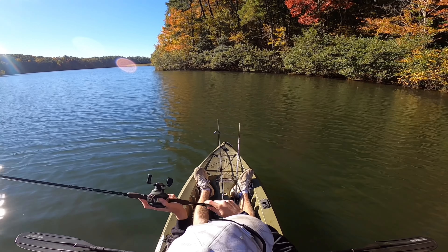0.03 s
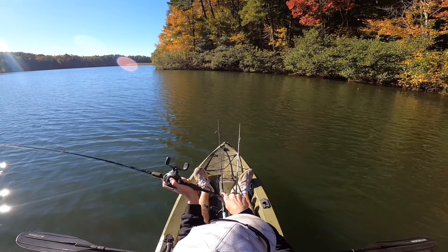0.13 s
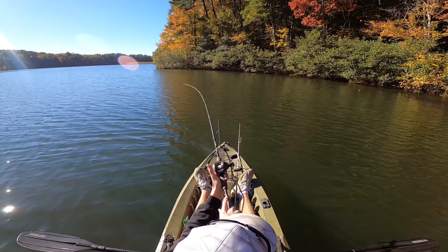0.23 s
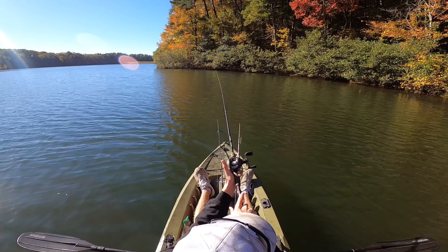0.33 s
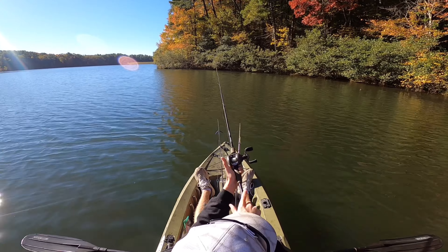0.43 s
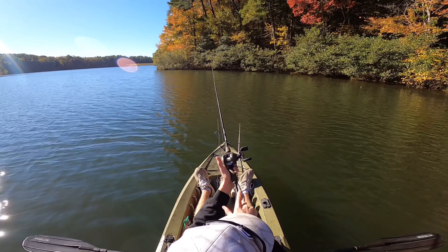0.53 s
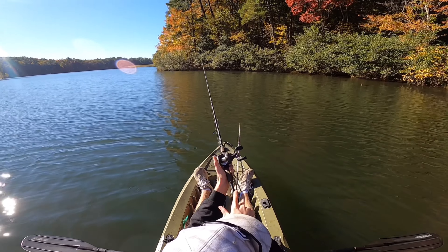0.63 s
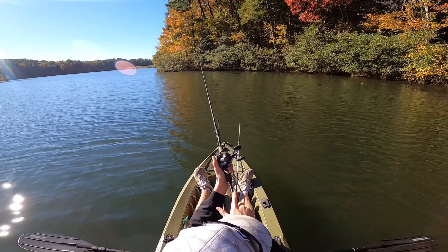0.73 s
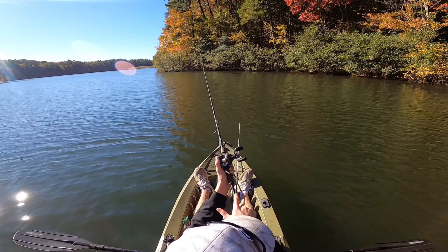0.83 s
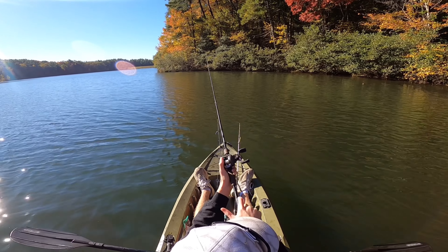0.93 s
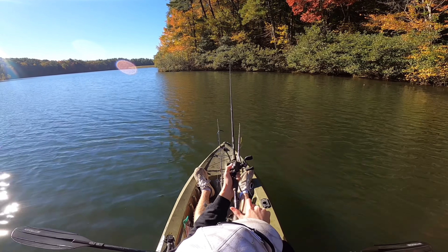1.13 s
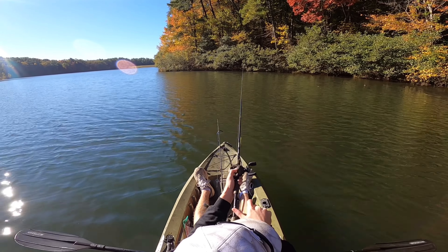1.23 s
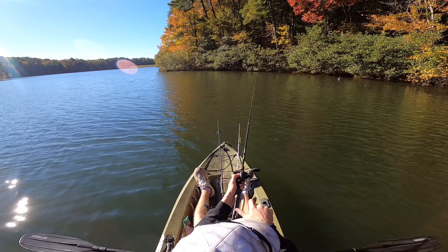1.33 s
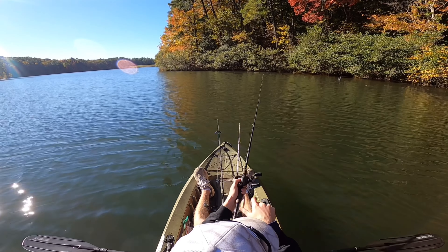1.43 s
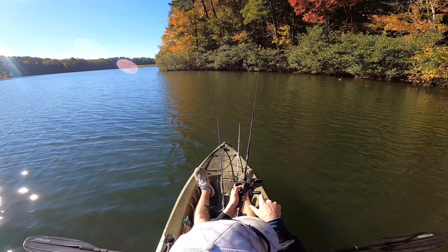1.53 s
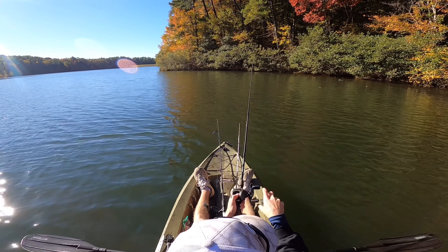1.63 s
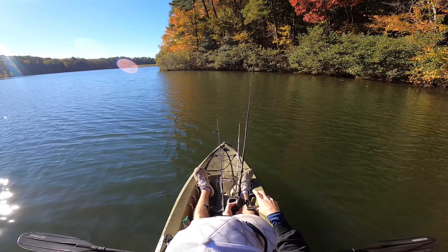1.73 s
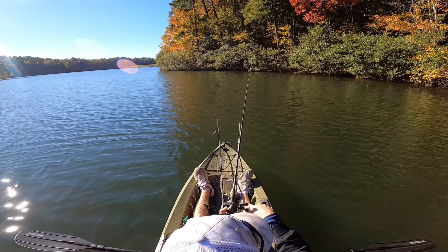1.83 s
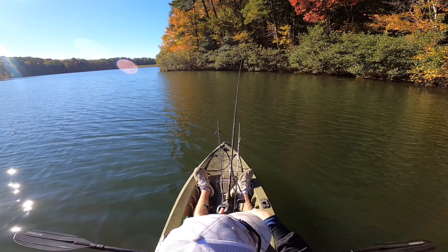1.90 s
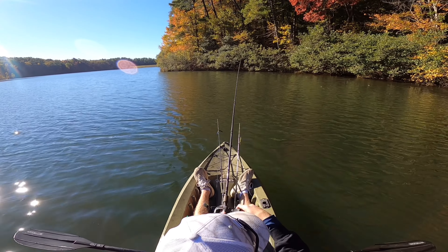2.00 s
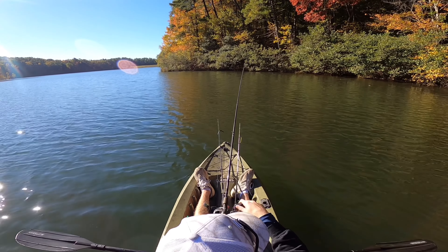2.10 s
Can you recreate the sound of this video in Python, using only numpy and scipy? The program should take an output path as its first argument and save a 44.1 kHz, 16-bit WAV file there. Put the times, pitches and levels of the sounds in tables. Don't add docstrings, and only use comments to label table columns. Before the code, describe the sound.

Fishing rod cast: quick swish, sharp thumb-release click, raspy whirring spool winding down, loud metallic clack

```python
import sys
import numpy as np
from scipy import signal
from scipy.fft import rfft, irfft, next_fast_len
from scipy.io import wavfile

SR = 44100
rng = np.random.default_rng(int(sys.argv[2]) if len(sys.argv) > 2 else 0)


def nominal_scale(level):
    x = np.asarray(level, float) / 20
    return 10 ** x


def master(y):
    cut = np.clip(np.atleast_2d(y).T, -1, 1)
    pcm = np.round(cut * 32767)
    wavfile.write(sys.argv[1], SR, pcm.astype(np.int16))


N = 92610
T = np.arange(N) / SR


def rms_one(x):
    return x / np.sqrt(np.mean(x ** 2) + 1e-20)


def curve(rows, x):
    return np.interp(x, *np.transpose(rows))


def log_curve(rows, hz):
    return curve([(np.log(f), db) for f, db in rows], np.log(hz))


def filtered(x, order, hz, kind="low"):
    return signal.sosfilt(signal.butter(order, hz, kind, fs=SR, output="sos"), x)


def resonance(x, hz, width_hz):
    r = np.exp(-np.pi * width_hz / SR)
    poles = [1, -2 * r * np.cos(2 * np.pi * hz / SR), r * r]
    return signal.lfilter(np.array([1, 0, -1]) * (1 - r * r) / 2, poles, x)


def drift(rate_hz):
    r = np.exp(-80 * np.pi * rate_hz / SR)
    white = rng.standard_normal(N // 40 + 2002)
    slow = signal.lfilter([1], [1, -2 * r, r * r], white)[2000:]
    return np.interp(np.arange(N) / 40, np.arange(len(slow)), rms_one(slow))


def pair(apart, grains=1):
    mid, side = rng.standard_normal((2, N)) * grains
    treble = filtered(side, 4, 9500, "high")
    return mid + (np.clip(apart, 0, 1) * side + 0.8 * treble) * [[1], [-1]]


def banded(spectrum, apart, patchy_db):
    out, together = 0, drift(1.9)
    white = [pair(apart), pair(apart)]
    edges = 25 * 2 ** np.arange(0, 9.6, .5)
    for k, (low, high) in enumerate(zip(edges, edges[1:])):
        db = log_curve(spectrum, np.sqrt(low * high))
        run_in = np.tile(white[k % 2], 2)[:, N // 2:]
        band = filtered(run_in, 2, [low, high], "band")[:, -N:]
        flicker_db = patchy_db * (2.25 * together + drift(31.0))
        out = out + nominal_scale(db + flicker_db) * band
    return rms_one(out)


def strikes(touches, modes, cut_hz):
    contact_s, spread_db = .00003, 1.0
    deck_db, deck_t60_s, deck_hz, deck_width_hz = -24, .15, 2300, 2200
    out, tick = np.zeros((2, N)), np.arange(SR // 20) / SR
    hz, db, t60 = np.transpose(modes)[:, :, None]
    draws = rng.standard_normal((len(touches), 3, len(modes) + 64))
    for (s, peak_db, dull), draw in zip(touches, draws):
        ring_db = db - 60 * tick / t60 - 9 * dull * np.log2(1 + hz / 500)
        rings = np.sin(2 * np.pi * hz * tick) * nominal_scale(ring_db)
        rings = (rings * nominal_scale(spread_db * draw[0, 64:, None])).sum(axis=0)
        grit = 1 + .4 * draw[0, :64] + .2 * draw[1:, :64]
        scuff = grit * np.exp(-tick[:64] / contact_s)
        both = signal.fftconvolve(scuff, rings[None], axes=1)
        i = int(s * SR)
        out[:, i:i + both.shape[1]] += nominal_scale(peak_db) * both / np.abs(both).max()
    tail = pair(0.43)[:, :SR // 4]
    for _ in range(2):
        tail = resonance(tail, deck_hz, deck_width_hz)
    tail = tail * nominal_scale(-60 * T[:SR // 4] / deck_t60_s)
    deck = signal.fftconvolve(out, tail / np.linalg.norm(tail[0]), axes=1)[:, :N]
    return filtered(out + nominal_scale(deck_db) * deck, 4, cut_hz, "high")


def blips(rows, rise):
    out = 0
    for s, db, hz, long in rows:
        t = T - s
        swell = np.exp(-(2 * t / long) ** 2)
        slide = 1 + rise * np.clip(t, -long, long) / long / 2
        out = out + nominal_scale(db) * np.sqrt(2) * swell * np.sin(2 * np.pi * hz * t * slide)
    return out


def lake_air():
    # (frequency [Hz], level [dB])
    wash = [(15, -44), (25, -14.5), (190, -1.5), (641, -19), (1290, -12.5), (2610, -14.5), (4030, -19.5),
            (8590, -29), (16000, -66)]
    level_db, stir_db, stir_s = -54, 3.0, 1
    stirred = nominal_scale(level_db + stir_db * np.exp(-(T / stir_s) ** 2))
    return stirred * banded(wash, apart=0.58, patchy_db=1.3)


def bird():
    # (time [s], level [dB])
    chips = [
        (-.1, -48),
        (0.0405, -50.5),
        (1.6803, -52.5),
    ]
    from_hz, to_hz, chip_s = 7500, 1800, .009
    lead_s, lead_db, lead_rise = 0.01333, 4, 0.087
    echo_s, echo_db, flutter = .0042, -4, .6
    woods_db, woods_t60_s = -9, .3
    early = SR // 4
    out = np.zeros(N + early)
    tick = np.arange(int((lead_s + chip_s) * SR)) / SR - lead_s
    fall = np.clip(tick / chip_s, 0, 1)
    hz = from_hz * (to_hz / from_hz) ** fall * (1 + lead_rise * np.minimum(tick / lead_s, 0))
    held = nominal_scale(lead_db) * (1 - fall) * np.clip(3 * (1 + tick / lead_s), 0, 1)
    plunge = np.sin(np.pi * fall) ** .7
    note = np.sin(2 * np.pi * np.cumsum(hz) / SR) * (held + plunge)
    note = note * (1 + flutter * np.sin(2 * np.pi * 2.3 * fall - 1.6))
    for s, db in chips:
        i = int((s - lead_s) * SR) + early
        out[i:i + len(note)] += nominal_scale(db) * note
    tail = rng.standard_normal((2, SR // 2)) * nominal_scale(-60 * T[:SR // 2] / woods_t60_s)
    tail = tail / np.sqrt((tail ** 2).sum() / 2)
    woods = signal.fftconvolve(out[None], tail, axes=1)[:, early:N + early]
    direct = out[early:]
    direct = direct + nominal_scale(echo_db) * np.roll(direct, int(echo_s * SR))
    return direct * nominal_scale([[2.5], [-2.5]]) + nominal_scale(woods_db) * 4 * woods


def insect():
    # (time [s], level [dB], length [s])
    pulses = [
        (0.037, -52.5, 0.04),
        (0.104, -59, .02),
        (1.39, -57.5, 0.036),
        (1.464, -85, 0.012),
        (1.757, -58, 0.027),
        (2.085, -72, 0.016),
    ]
    hiss = pair(0.78)
    for _ in range(2):
        hiss = resonance(hiss, 5060, 1400)
    return rms_one(hiss) * sum(nominal_scale(db) * np.exp(-((T - s) / long) ** 2) for s, db, long in pulses)


def low_thumps():
    # (time [s], level [dB], frequency [Hz], length [s]); the last three go with thumb and gear
    thumps = [(.06, -48.5, 150, 0.027), (.09, -47.5, 160, 0.024), (.13, -50, 171, 0.02),
              (.205, -51, 62.5, 0.047), (.3, -52, 71, 0.028), (1.6, -57, 87, 0.032), (1.7, -48, 130, 0.013),
              (.2425, -30, 378, 0.012), (.279, -28.5, 426, 0.0034), (1.812, -43, 490, 0.009)]
    return blips(thumps, rise=-0.022)


def rod():
    # (time [s], level [dB])
    stroke = [
        (.12, -68),
        (.16, -53),
        (.185, -43.5),
        (.203, -33.5),
        (.228, -24),
        (.255, -31),
        (.28, -27),
        (.32, -39),
    ]
    # (frequency [Hz], level [dB])
    swish = [(35, -47), (100, -6), (416, -9), (904, -4.5), (1660, -2.5), (3840, -3.5), (7350, -11),
             (13200, -33.5), (15000, -44)]
    whistle_hz, octaves_per_s, width_hz = 5760, 11, 1850
    whistle_db, whistle_s, length_s = -43, 0.19, 0.041
    hz = whistle_hz * 2 ** np.clip(octaves_per_s * (T - whistle_s), -1, 1)
    flutter = filtered(pair(1.0), 2, width_hz / 2)
    whistle = rms_one(flutter * np.sin(2 * np.pi * np.cumsum(hz) / SR))
    whistle *= nominal_scale(whistle_db) * np.exp(-((T - whistle_s) / length_s) ** 2)
    stopping = np.clip((stroke[-1][0] - T) / 0.015, 0, 1)
    effort = nominal_scale(curve(stroke, T)) * stopping * (T > stroke[0][0])
    return effort * banded(swish, apart=0.2, patchy_db=1.5) + whistle


def loose_ticks():
    # (time [s], peak level [dB], dullness [0-1, below 0 brighter])
    touches = [(.1425, -44, .6), (.178, -46, .9), (1.5385, -26, 0.16), (1.544, -47, .8), (1.549, -41, .2),
               (1.554, -38.5, .2), (1.639, -47, -.2), (1.751, -44, .6), (1.7605, -33, -0.48),
               (1.7675, -31.5, -0.23), (1.7838, -23.5, -0.2), (1.7945, -13, 0.079), (1.7975, -25, -0.056),
               (1.926, -51, .5)]
    # (frequency [Hz], level [dB], decay time to -60 dB [s])
    modes = [(1250, -23, 0.0035), (1870, -5, 0.0025), (2570, 4, .004), (3400, 5, .003), (4360, 1, 0.0037),
             (5250, -1, 0.0021), (6900, 2, 0.0036), (8100, -5, .003), (9500, -11, .002), (12500, -22, .002)]
    return strikes(touches, modes, cut_hz=900)


def thumb_release():
    # (time [s], peak level [dB], dullness [0 bright, 1 and over dull])
    touches = [
        (.2362, -22, 1.5),
        (.2390, -8, .1),
        (.2416, -3, .05),
        (.2432, -8, .1),
        (.2475, -18, .3),
        (.2785, -20, .9),
    ]
    # (frequency [Hz], level [dB], decay time to -60 dB [s])
    modes = [(1140, -20.5, 0.0044), (2450, -6.5, 0.012), (3800, -11.5, 0.0058), (4430, 2.5, 0.00406),
             (5240, 15.5, .006), (6750, 16, .008), (12500, -5, .003)]
    return strikes(touches, modes, cut_hz=250)


def spool():
    # (time [s], speed [turns/s])
    spin = [(0.26, 202.9), (0.32, 278.6), (0.412, 313.4), (0.55, 250.1), (0.75, 198.1), (0.95, 149.6),
            (1.12, 119.9), (1.25, 104.3), (1.4, 82.7)]
    # (time [s], level [dB])
    pull = [
        (0.255, -36),
        (0.305, -21),
        (0.533, -22),
        (0.553, -25),
        (0.637, -23.5),
        (1.171, -34.5),
        (1.375, -44),
        (1.385, -35.5),
        (1.41, -56),
    ]
    # (frequency [Hz], width [Hz], level [dB], gain per halving of speed [dB])
    frame = [(1082, 266, -11, -1.5), (1510, 250, -6.5, -2), (2455, 478, -2.5, -0.5), (3474, 516, 0.5, -1.5),
             (4480, 1160, -0.5, -5.5), (6880, 607, 3, -5), (8880, 2800, -12, -2.5),
             (13000, 12400, -20.5, -19)]
    # (multiple of turn rate, level at top speed [dB], loss per halving of speed [dB])
    hum_tones = [(1, -38.5, 24), (2, -51, 15.5), (3, -52, 19), (4, -42, 13.5), (5, -42.5, 16.5),
                 (6, -45, 13)]
    grains_per_s, turn_spread_db = 9000, 2
    slap_turn, slap_rise, slap_fall = .06, .08, 0.22
    between_fast, between_slow = 2.3, 0.34
    edge_hz, edge_db = 1017, 12
    speed = curve(spin, T)
    turns = np.cumsum(speed) / SR
    slower = np.log2(speed.max() / speed)

    part, whole = (turns - slap_turn) % 1, (turns - slap_turn).astype(int)
    slap = (1 - np.exp(-part / slap_rise)) * np.exp(-part / slap_fall)
    slap = slap / slap.max() * nominal_scale(turn_spread_db * rng.standard_normal(N)[whole])
    between = between_fast * (between_slow / between_fast) ** (slower / 2)
    grains = rng.random(N) < grains_per_s / SR
    rasp = pair(0.22, grains) * (between + slap) / (between + .5)
    body = 0
    for k, (hz, width, db, gain_db) in enumerate(frame):
        sign = (-1) ** k
        body = body + sign * nominal_scale(db + gain_db * slower) * resonance(rasp, hz, width)
    body = filtered(body, 3, 560, "high")

    hum = 0
    for k, db, loss_db in hum_tones:
        sunk_db = edge_db * np.minimum(np.log2(k * speed / edge_hz), 0) if k > 2.5 else 0
        waver_db = (2.0 if k == 1 else 4.0) * drift(20.0)
        tone = np.sin(2 * np.pi * round(k) * turns + 2.5 * k)
        hum = hum + nominal_scale(db - loss_db * slower + sunk_db + waver_db) * tone

    running = np.clip((T - pull[0][0]) / 0.027, 0, 1) * np.clip((pull[-1][0] - T) / 0.011, 0, 1)
    return running * (rms_one(body) * nominal_scale(curve(pull, T)) + np.sqrt(2) * hum)


def drips():
    # (time [s], level [dB], frequency [Hz], length [s])
    drops = [
        (1.499, -75, 1340, 0.026),
        (1.546, -54, 1150, 0.013),
        (1.558, -47.5, 1390, 0.0064),
        (1.571, -54, 2040, 0.0092),
        (1.604, -57, 1300, 0.012),
        (1.6475, -48, 2000, 0.0091),
        (1.700, -48.5, 1250, 0.0069),
        (1.731, -53, 1320, 0.009),
        (1.915, -56.5, 1330, 0.027),
        (1.953, -55, 1360, 0.0081),
    ]
    return blips(drops, rise=.1)


def gear_engage():
    # (time [s], peak level [dB], dullness [0-1])
    touches = [(1.8002, -29, .3), (1.8025, -30, 0.1), (1.8036, -22, .05), (1.8054, 3, 0.1),
               (1.8059, 6, 0.36), (1.8068, 1, 0), (1.8077, 3, .05), (1.8098, -11, 0), (1.8118, -13, .05),
               (1.8140, -19, 0.2), (1.8205, -30, 0.8), (1.825, -22, 0.8)]
    # (frequency [Hz], level [dB], decay time to -60 dB [s])
    modes = [(1330, -38, 0.004), (1730, -12, 0.014), (2280, -13, 0.01), (2600, -0.5, 0.02),
             (3180, -4, 0.014), (3700, -2.5, 0.0068), (5030, 4.5, 0.0069), (5480, 0.5, 0.0053),
             (6830, -4, 0.0059), (7200, 5, 0.0046), (8200, -1, 0.0045), (8800, -14, .003),
             (11800, -14, .002)]
    return strikes(touches, modes, cut_hz=1200)


def ports(x):
    # (frequency [Hz], level [dB])
    balance = [(60, 0), (150, 0), (380, 0.5), (950, -2.5), (2380, 0.5), (5980, 1), (15000, -13.5)]
    lag_s = 4.0e-5
    size = next_fast_len(N + 512)
    hz = np.arange(size // 2 + 1) * SR / size
    tilt = log_curve(balance, hz + 1) / 2
    turn = np.exp(-1j * np.pi * hz * lag_s)
    return irfft(rfft(x, size) * [nominal_scale(tilt) * turn, nominal_scale(-tilt) / turn], size)[:, :N]


def scene():
    lake = lake_air() + bird() + insect() + low_thumps() + drips()
    reel = rod() + loose_ticks() + thumb_release() + spool() + gear_engage()
    return ports(lake + reel)


def low_pass(x):
    return signal.sosfilt(signal.butter(12, 16510, fs=SR, output="sos"), x)


def record(dry):
    top = .9
    x = filtered(dry, 2, 39.5, "high")
    x = filtered(x, 6, 13700)
    x = top * np.tanh(x / top)
    mix = signal.sosfilt(signal.cheby2(10, 60, 16300, fs=SR, output="sos"), x)
    return low_pass(mix)


dry = scene()
out = record(dry)
master(out)
```